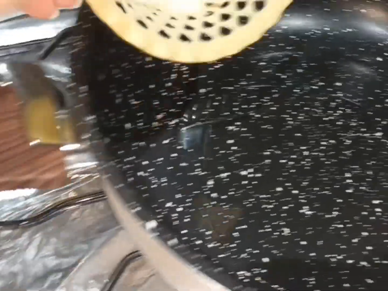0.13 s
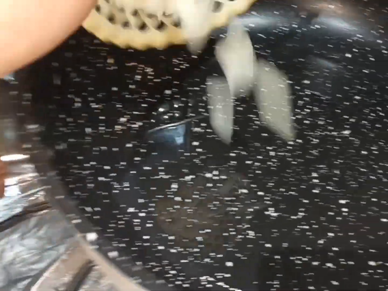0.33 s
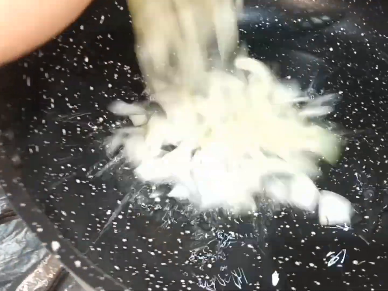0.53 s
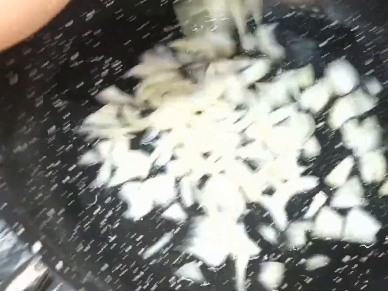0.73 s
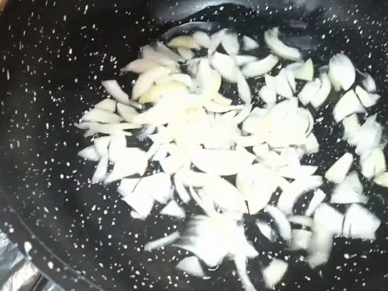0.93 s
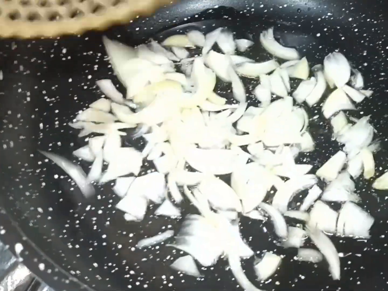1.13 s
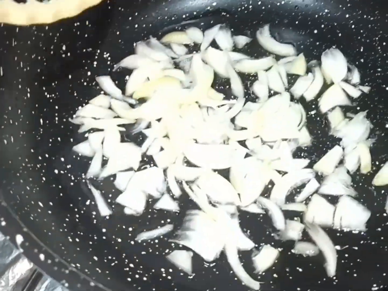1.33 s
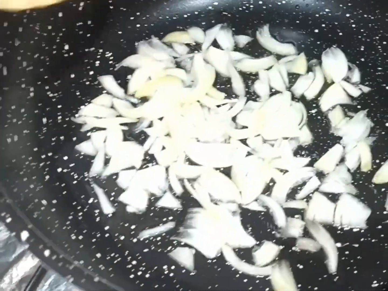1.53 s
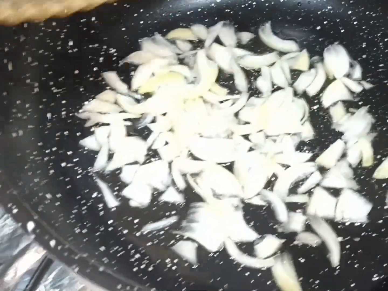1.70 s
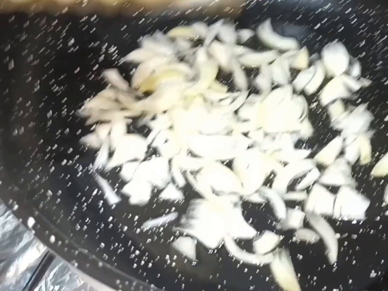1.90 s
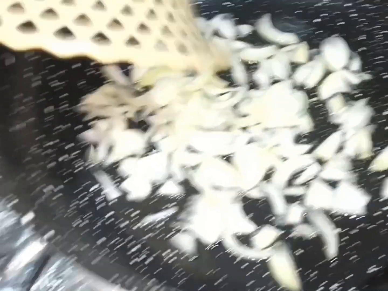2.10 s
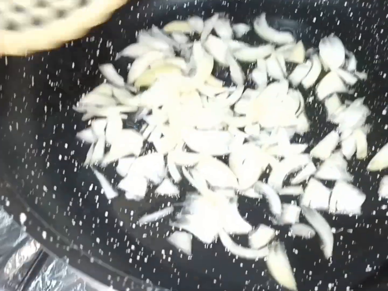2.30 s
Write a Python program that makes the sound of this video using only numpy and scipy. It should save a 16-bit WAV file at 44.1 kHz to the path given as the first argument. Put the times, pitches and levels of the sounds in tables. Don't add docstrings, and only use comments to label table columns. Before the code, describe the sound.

Sliced onions pour into a nonstick pan, heard close in stereo in a kitchen with short echo. After near quiet and tiny plastic ticks, a dense burst of hollow thuds and wet rustling starts at 0.24 seconds, thinning by 0.75. The plastic basket knocks the rim at 0.86, lightly at 1.05, dully at 1.47, then brightly at 1.79 and 1.96, with rattling and pan rocking over faint sizzle, fan and low hum.

```python
import sys
import numpy as np
from scipy import signal
from scipy.fft import rfft, irfft
from scipy.io import wavfile
from scipy.ndimage import uniform_filter1d

SR = 44100
rng = np.random.default_rng(int(sys.argv[2]) if len(sys.argv) > 2 else 0)


def gain_from_db(level_db):
    decades = np.asarray(level_db, float) / 20
    return 10 ** decades


def to_wav(s):
    ch = np.atleast_2d(s).T
    pcm = np.round(np.clip(ch, -1, 1) * 32767)
    wavfile.write(sys.argv[1], SR, pcm.astype(np.int16))


N = 103635

# pitch_hz, lead_rad
LEFT_LEAD = [(30, 0), (470, -.3), (560, -1.8), (1500, -1.4), (4000, -1.8), (8000, -4), (16000, -5)]
# pitch_hz, level_db
LEFT_LEVEL = [(30, -6.5), (300, 2.5), (520, -0.5), (800, -3.5), (1200, 6.5), (3000, 6), (16000, -2)]
# pitch_hz, likeness (0 to 1)
LIKENESS = [(30, 0.86), (400, 1), (550, 0.65), (2000, 0.47), (5000, 0.1), (16000, 0.11)]
# pitch_hz, gain_db
MIC_COLOUR = [(2600, 1), (3450, -1), (4200, 1.5), (5200, 5), (8000, -0.5), (10300, 7), (13300, -9.5),
              (14700, -1)]
# pitch_hz, level_db
SUPPRESSOR_THRESHOLD = [(60, -85.5), (300, -61), (1200, -82), (2500, -87.5), (16000, -90.5)]

# pitch_hz, width_hz, level_db
FAN_BANDS = [(1464, 220, -72.5), (2128, 93, -69.5), (780, 260, -70)]
# start_s, end_s, pitch_hz, level_db
WHINES = [(0, .045, 2940, -68), (.03, .11, 3700, -69), (.135, .2, 3700, -75), (0, .2, 5560, -82),
          (0, .07, 4820, -82)]
# pitch_hz, level_db per Hz
ROOM_COLOUR = [(30, -18), (200, -12), (1200, -18), (2200, -13.5), (4500, -25.5), (8000, -40),
               (16500, -25.5)]
# pitch_hz, level_db per Hz
SIZZLE_COLOUR = [(40, 1), (88, -16), (130, -27), (400, -39), (1100, -7), (2200, -3), (6000, -1),
                 (16500, -2)]

# start_s, peak_db, pitch_hz, left_right_db
TICKS = [(0.125, -49, 6440, 3.5), (0.2174, -57.5, 5800, 8), (0.404, -27, 6760, 7),
         (0.6718, -34.5, 5500, -3), (0.7297, -43, 4600, -8), (0.2341, -42, 9400, 5),
         (0.3347, -47, 6250, 28), (0.3475, -51, 6500, -7), (0.745, -38.5, 8600, 1),
         (0.7846, -41.5, 6100, 5), (0.978, -32, 5730, -1), (1.6125, -37, 9700, -1), (2.2187, -39, 6500, 5),
         (2.224, -51, 6460, 2), (2.2191, -33.5, 12050, -16)]
# start_s, pitch_hz, peak_db
CLACKS = [(0.125, 4760, -56), (0.122, 5900, -52), (0.7847, 2830, -49), (0.859, 1894, -25.5),
          (0.86, 2710, -51), (0.861, 4230, -41), (0.859, 5050, -29), (0.977, 4270, -46),
          (1.0498, 1132, -35.5), (1.0482, 1780, -42.5), (1.0491, 2768, -38.5), (1.0491, 4770, -47),
          (1.4732, 1220, -43), (1.4742, 1940, -47), (1.4734, 2374, -45), (1.4752, 2910, -34),
          (1.79, 1820, -29), (1.788, 5250, -18), (1.9604, 5050, -17), (1.961, 1680, -39),
          (1.6122, 6850, -45), (2.2196, 6740, -49), (0.859, 1085, -40)]

# start_s, crack_peak_db, tilt_db per octave, body_db, shake_t60_s
KNOCKS = [
    (0.8581, -22.5, -17, -15.5, 0.94),
    (1.0491, -36.5, -18, -33, 0.15),
    (1.4747, -26.5, -35.5, -21.5, 0.77),
    (1.789, -16, 0.5, -25, 1),
    (1.9605, -18, -0.5, -25.5, 0.23),
    (2.12, -62, -26, -36.5, 0.61),
]
# start_s, peak_db
ROCKS = [(0.884, -31), (0.937, -39), (0.967, -25), (1.029, -27.5), (1.074, -35), (1.111, -47),
         (1.15, -46.5), (1.188, -42), (1.25, -52), (1.289, -62), (1.48, -42.5), (1.53, -37.5), (1.508, -39),
         (1.56, -40), (1.636, -36.5), (1.68, -42.5), (1.72, -44), (1.75, -52), (1.832, -19), (1.854, -22.5),
         (1.891, -23), (1.929, -35.5), (1.985, -26.5), (2.008, -33), (2.03, -22), (2.043, -30),
         (2.169, -48.5), (2.238, -53)]
# pitch_hz, level_db, t60_s
ROCKING_MODES = [(94.5, -17.5, 0.35), (136.8, -20.5, 0.55), (164, -18.5, 0.57), (239.53, -13.5, 0.57),
                 (298.8, -12.5, 0.18), (348.6, -3, 0.13), (441.6, -4, 0.15), (465.3, -3, 0.11),
                 (523.3, -13, 0.37), (667, -25.5, 0.3)]
# pitch_hz, level_db, t60_s
EDGE_MODES = [(977.4, 0, 0.5), (1070, -3, 0.12), (1361, -0.7, 0.47), (1800, -10, 0.029), (1922, -2, 0.53),
              (2440, -4, 0.55), (2750, 3.5, 0.051), (4810, -2, 0.24), (5080, -2.5, 0.26), (5370, -5, 0.35),
              (5400, 4, 0.23), (5670, -6, 0.137)]
# pitch_hz, level_db per Hz
CRACK_COLOUR = [(400, -44), (900, -13), (1800, -4), (3500, -7), (5000, -3.5), (9000, -2.5), (16500, -9)]
# pitch_hz, level_db per Hz
RATTLE_COLOUR = [(400, 3.5), (900, -2), (2000, -3), (3500, -0.5), (5500, 1.5), (10000, -7.5),
                 (16500, -13.5)]

# start_s, flow_db, rustle_db against the flow
POUR = [
    (0.2364, -38.5, 4.5),
    (.273, -21.5, -21),
    (0.327, -31.5, -15.5),
    (.345, -24.5, -5.5),
    (.41, -34, -2),
    (.5, -41.5, -1.5),
    (0.651, -53, 4.5),
    (0.701, -56, -5),
    (0.802, -73.5, 16),
]
# start_s, peak_db, softness_ms
PIECES = [(0.235, -27.5, 1.04), (0.262, -15.5, 0.96), (0.283, -49, 2.8), (0.333, -34, 1.9),
          (0.345, -16, 1.13), (0.361, -17, 0.94), (0.373, -25.5, 0.36), (0.409, -24, 0.8),
          (0.425, -32, 0.9), (0.446, -29.5, 0.87), (0.476, -18, 2.33), (0.498, -37.5, 1.4),
          (0.523, -39, 2.5), (0.549, -33, 1.8), (0.573, -29, 1.8), (0.595, -36, 1.55), (0.64, -30.5, 2.16),
          (0.672, -30, 1.17), (0.69, -31, 1.57), (0.706, -43, 0.97), (0.75, -45, 1.23)]
# pitch_hz, level_db, t60_s
PAN_MODES = [(293.6, -4.5, 0.32), (302.8, -9, 0.17), (428.2, -4, 0.18), (472.4, -11, 0.36), (524, -5, 0.22),
             (668.5, -11.5, 0.15), (846.3, 0, 0.085), (1073, -8.5, 0.12), (1283, -18, 0.083),
             (1373, -2, 0.11), (1615, 0.5, 0.03), (347.2, -43, 0.34)]
# pitch_hz, level_db per Hz
RUSTLE_COLOUR = [(300, -13), (700, -29), (1400, -13), (2500, -4), (5500, 0), (10000, -2.5), (13000, -2),
                 (16500, 3)]

THUDS_PER_S = 330


def read(points, hz):
    f, value = np.transpose(points)
    return np.interp(np.log(hz + 1), np.log(f + 1), value)


def evened(x):
    return x / np.sqrt(np.mean(x ** 2) + 1e-20)


def add(mix, start_s, sound):
    part = mix[..., round(start_s * SR):][..., :sound.shape[-1]]
    part += sound[..., :part.shape[-1]]


def high_pass(x, order, hz):
    return signal.sosfilt(signal.butter(order, hz, "high", fs=SR, output="sos"), x)


def two_mics(shared, other, colour, tilt_db=0., lumps=(0., 0.)):
    n = shared.shape[-1]
    hz = np.fft.rfftfreq(n, 1 / SR)
    comb = np.interp(hz, np.linspace(0, SR / 2, len(lumps)), lumps)
    tilt = tilt_db * np.log2(np.maximum(hz, 4500) / 4500)
    gain = gain_from_db(read(colour, hz) + comb + tilt)
    like = np.clip(read(LIKENESS, hz), 0, 1)
    side = gain_from_db(read(LEFT_LEVEL, hz) / 2)
    left = rfft(shared)
    right = like * left + np.sqrt(1 - like ** 2) * rfft(other)
    right = right * np.exp(-1j * read(LEFT_LEAD, hz))
    return evened(irfft(np.array([left * side, right / side]) * gain, n))


def ring(force, modes):
    rise_cycles, longest_s = 1.38, 0.62
    t, response = np.arange(SR) / SR, 0
    for hz, db, t60 in modes:
        lag = np.array([[0], [read(LEFT_LEAD, hz)]])
        side_db = read(LEFT_LEVEL, hz) / 2 * np.array([[1], [-1]])
        swell = np.sin(np.pi / 2 * np.minimum(t * hz / rise_cycles, 1)) ** 2
        decay = gain_from_db(db - 60 * t / min(t60, longest_s) + side_db)
        response = response + swell * decay * np.sin(2 * np.pi * hz * t - lag)
    return signal.fftconvolve(force[None], response, axes=1)[:, :N]


def push(ms):
    w = np.hanning(max(int(ms * SR / 1000), 1) + 2)
    return w / w.sum()


def sparse(per_s, spread_db):
    size = gain_from_db(spread_db * np.minimum(rng.exponential(1, N), 4))
    return evened(size * rng.standard_normal(N) * (rng.random(N) < per_s / SR))


def kitchen():
    sizzle_start_s, sizzle_db, quiet_db = 0.234, -59, -64.5
    t, hz = np.arange(N) / SR, np.fft.rfftfreq(N, 1 / SR)
    a, b, c, d, e, f = rng.standard_normal((N, 6)).T
    bands = 0
    for centre, width, db in FAN_BANDS:
        bands = bands + gain_from_db(db) / (1 + (2 * (hz - centre) / width) ** 2) * np.sqrt(SR / 2 / width)
    fan = irfft(rfft(np.array([e, f])) * bands, N)
    drift_hz = 12.0 * evened(uniform_filter1d(e, size=900))
    for start, end, pitch, db in WHINES:
        fade = np.clip(np.minimum(t - start, end - t) / 0.012 + 0.5, 0, 1)
        turns = np.cumsum(pitch + drift_hz) / SR
        fan = fan + gain_from_db(db) * fade * np.sin(2 * np.pi * turns)
    frying = np.clip((t - sizzle_start_s) / 0.0046, 0, 1)
    sizzle = gain_from_db(sizzle_db) * two_mics(a + 0.19 * sparse(1400, 1.0), b, SIZZLE_COLOUR)
    quiet = gain_from_db(quiet_db) * two_mics(c, d, ROOM_COLOUR)
    return frying * sizzle + (1 - frying) * quiet + fan * (0.5 + 0.5 * frying)


def room(near):
    taps = np.zeros((2, SR // 2))
    at = np.arange(200, SR // 2 - 20, 20) + rng.integers(0, 20, (2, (SR // 2 - 201) // 20))
    np.put_along_axis(taps, at, rng.choice([-1., 1.], at.shape), 1)
    hz, t, z = signal.stft(taps, SR, nperseg=256)
    t60 = read([(100, 0.52), (1000, 0.35), (5000, 0.16), (15000, 0.13)], hz)[:, None]
    like = np.clip(read(LIKENESS, hz), 0, 1)[:, None]
    z = np.array([z[0], like * z[0] + np.sqrt(1 - like ** 2) * z[1]])
    tail = signal.istft(z * gain_from_db(-60 * t / t60), SR, nperseg=256)[1]
    return signal.fftconvolve(near, tail / np.linalg.norm(tail[0]), axes=1)[:, :N]


def cooker_top(near):
    hum_hz, swell_s, hum_db = 89, 0.15, -26.5
    r = np.exp(-1 / (swell_s * SR))
    swell = signal.lfilter([(1 - r) ** 2], [1, -2 * r, r * r], abs(near).mean(0))
    band = signal.butter(2, [hum_hz - 20.5, hum_hz + 40], "band", fs=SR, output="sos")
    return gain_from_db(hum_db) * swell * evened(signal.sosfilt(band, rng.standard_normal(N)))


def plastic_ticks():
    t, out = np.arange(4000) / SR, np.zeros((2, N))
    shape = gain_from_db(-60 * t / 0.022) + gain_from_db(-12 - 60 * t / 0.11)
    for start, db, hz, left_right_db in TICKS:
        a, b = rng.standard_normal((len(t), 2)).T
        colour = [(0.4 * hz, -32), (0.7 * hz, -14), (0.92 * hz, -9), (hz, -1.5), (1.09 * hz, -9), (17000, -15)]
        side_db = (left_right_db + 3.5) * np.array([[0.5], [-0.5]])
        add(out, start, two_mics(a, b, colour) * shape * gain_from_db(db - 10.0 + side_db))
    return out


def basket_clacks():
    t60_s, rise_s = 0.026, 0.00077
    t, out = np.arange(4000) / SR, np.zeros((2, N))
    side = np.array([[1], [-1]]) / 2
    for start, hz, db in CLACKS:
        wave = np.sin(2 * np.pi * hz * t + side * read(LEFT_LEAD, hz)) * np.minimum(t / rise_s, 1)
        add(out, start, wave * gain_from_db(db - 60 * t / t60_s + side * read(LEFT_LEVEL, hz)))
    return out


def knocks():
    crack_t60_s, rattle_t60_s, rattle_droop = 0.035, 0.27, 1.787
    t = np.arange(SR // 2) / SR
    (force, edge, blow), out = np.zeros((3, N)), np.zeros((2, N))
    shake = np.convolve(sparse(THUDS_PER_S, 2.1), push(1.0), "same")
    lumps = 2 * rng.standard_normal(300)
    for start, db, tilt_db, body_db, shake_t60 in KNOCKS:
        a, b, c, d = rng.standard_normal((len(t), 4)).T
        c, d = np.array([c, d]) * gain_from_db(1.6 * evened(uniform_filter1d(a, size=120)))
        crack = two_mics(a, b, CRACK_COLOUR, tilt_db) * gain_from_db(db - 2.0 - 60 * t / crack_t60_s)
        rattle_env = gain_from_db(db - 16 + 0.19 * tilt_db - 60 * (t / rattle_t60_s) ** rattle_droop)
        rattle = two_mics(c, d, RATTLE_COLOUR, tilt_db, lumps) * rattle_env
        rise_s = 0.00015 + 0.000071 * abs(tilt_db)
        add(out, start, np.minimum(t / rise_s, 1) * (crack + rattle))
        add(edge, start, gain_from_db(db - 22) * push(0.06 - 0.018 * tilt_db))
        add(blow, start - 0.001, gain_from_db(body_db - 7.0) * push(0.95))
        i = round(start * SR)
        shake_env = np.minimum(t / 0.017, 1) * gain_from_db(body_db - 47.0 - 60 * (t / shake_t60) ** 0.83)
        add(force, start, shake[i:i + len(t)] * shake_env[:N - i])
    for start, db in ROCKS:
        add(force, start, gain_from_db(db - 7.5) * push(1.23))
    blow = high_pass(blow, 2, 310)
    return out + ring(force + blow, ROCKING_MODES) + ring(edge, EDGE_MODES)


def pour():
    loaded_s, loaded_pitch, loaded_ring = 0.44, 1.03, 0.43
    t = np.arange(N) / SR
    s, flow_db, rustle_db = np.transpose(POUR)
    pouring = (t > s[0]) & (t < s[-1])
    flow = pouring * gain_from_db(np.interp(t, s, flow_db))
    thuds = np.convolve(sparse(THUDS_PER_S, 3.5), push(0.93), "same")
    stream = evened(ring(thuds * flow, PAN_MODES))
    stream *= gain_from_db(-16.0) * np.sqrt(np.mean(flow ** 2))
    force = np.zeros(N)
    for start, db, softness_ms in PIECES:
        add(force, start, gain_from_db(db - 8.5) * push(softness_ms))
    loaded = [(hz * loaded_pitch, db, t60 * loaded_ring) for hz, db, t60 in PAN_MODES]
    pieces = ring(force * (t < loaded_s), PAN_MODES) + ring(force * (t >= loaded_s), loaded)
    body = high_pass(stream + pieces, 4, 245)
    grains = [sparse(3100, 2.0) + 0.53 * rng.standard_normal(N) for _ in range(2)]
    rustle = pouring * gain_from_db(np.interp(t, s, flow_db + rustle_db)) * two_mics(*grains, RUSTLE_COLOUR)
    return body + rustle


def scene():
    near = plastic_ticks() + basket_clacks() + knocks() + pour()
    return kitchen() + gain_from_db(-6.0) * room(near) + cooker_top(near) + near


def suppress(x):
    depth_db, knee_db = 6, 3
    hz, _, z = signal.stft(x, SR, nperseg=1024, noverlap=768)
    power = (abs(z) ** 2).mean(0)
    power = uniform_filter1d(uniform_filter1d(power, size=3, axis=0), size=3, axis=1)
    level_db = 10 * np.log10(abs(power) + 1e-20)
    under = np.clip((read(SUPPRESSOR_THRESHOLD, hz)[:, None] - level_db) / knee_db, 0, 1)
    return signal.istft(z * gain_from_db(-depth_db * under), SR, nperseg=1024, noverlap=768)[1][:, :N]


def low_pass(x):
    return signal.sosfilt(signal.butter(12, 17060, fs=SR, output="sos"), x)


def record(dry):
    hz = np.fft.rfftfreq(1024, 1 / SR)
    taps = signal.minimum_phase(signal.firwin2(1023, hz, gain_from_db(2 * read(MIC_COLOUR, hz)), fs=SR))
    coloured = signal.oaconvolve(dry, taps[None], axes=1)[:, :N]
    low_end = signal.butter(3, 75, "high", fs=SR, output="sos")
    high_end = signal.cheby1(8, 1, 15700, fs=SR, output="sos")
    mix = suppress(signal.sosfilt(np.vstack([low_end, high_end]), coloured))
    return low_pass(mix)


dry = scene()
out = record(dry)
to_wav(out)
```